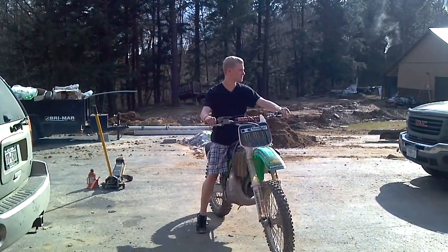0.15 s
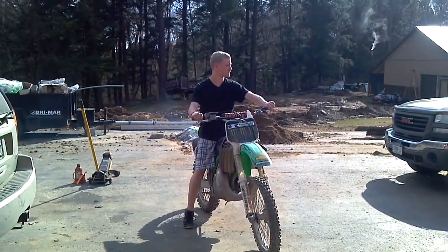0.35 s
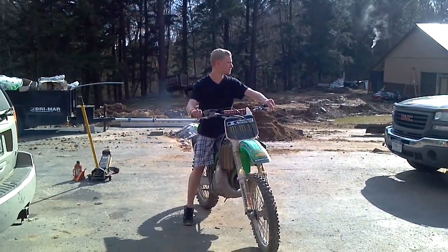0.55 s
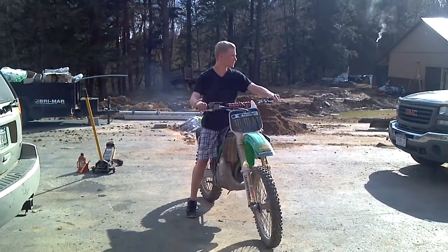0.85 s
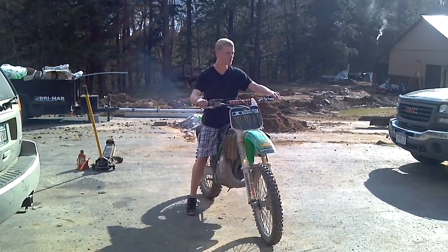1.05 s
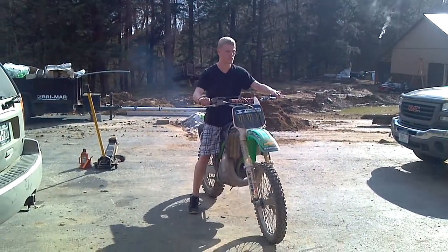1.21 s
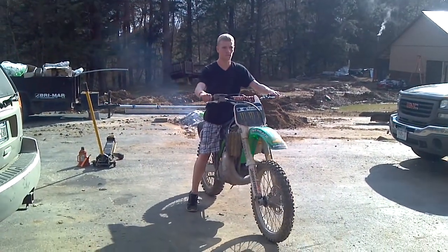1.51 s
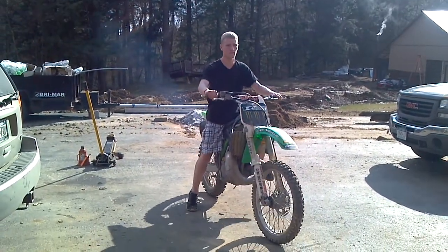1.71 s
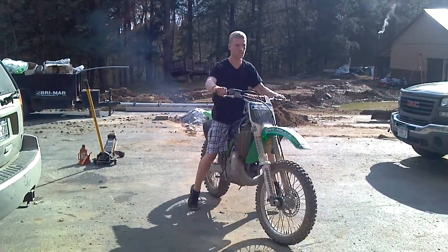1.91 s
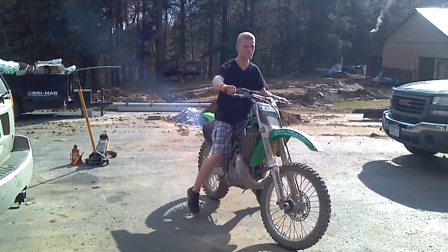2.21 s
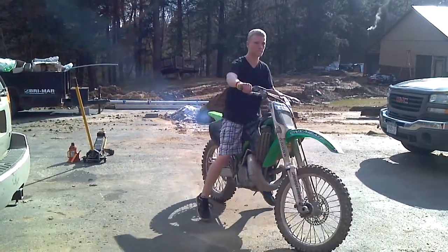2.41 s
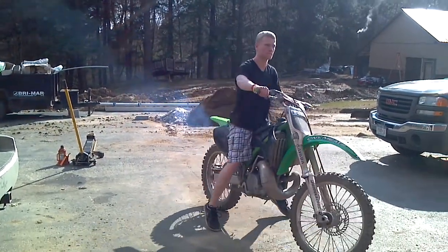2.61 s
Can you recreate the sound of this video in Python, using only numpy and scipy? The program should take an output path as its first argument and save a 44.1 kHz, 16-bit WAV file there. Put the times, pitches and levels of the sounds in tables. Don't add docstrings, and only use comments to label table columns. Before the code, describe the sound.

A single-cylinder two-stroke dirt bike idles with uneven crackling pops, clunks into gear and revs away

```python
import sys
import numpy as np
from scipy import signal
from scipy.fft import rfft, irfft
from scipy.io import wavfile

SR = 44100
rng = np.random.default_rng(int(sys.argv[2]) if len(sys.argv) > 2 else 0)


def amplitude_ratio(level_db):
    exponent = np.asarray(level_db, float) / 20
    return 10 ** exponent


def persist_wave(psi):
    counts = np.round(np.clip(psi, -1, 1) * 32767).astype(np.int16)
    wavfile.write(sys.argv[1], SR, np.atleast_2d(counts).T)


N = 121275

# start_s [s], crack_peak_db [dB], thump_db [dB re usual], roar_db [dB re usual]
IDLE_FIRINGS = [(0.1786, -28, 3, 1), (0.2422, -7, 13, -1.5), (0.386, -17, 4, 1), (0.4472, -11, -7, -3.5),
                (0.5631, -25, 2, 9.5), (0.6834, -43, -5, -12), (0.7761, -27, -10, -23),
                (0.844, -5.5, -12, -1.5), (1.05, -7.5, 14, 1.5), (1.1277, -7.5, 6, 1),
                (1.254, -10.5, 18, 3.5), (1.305, -15.5, -2, 2.5), (1.3535, -8, 3, 1.5),
                (1.475, -2, 14, 0.5), (1.497, -2.5, 18.5, -7.5), (1.5146, -7, 16, 1.5),
                (1.5311, -4, 7, -3.5), (1.5927, -21, 5, 12), (1.7339, -25, 7, 13.5),
                (1.7778, -15.5, 27, 3.5)]
IDLE_TURNS = [6, 2, 5, 2, 4, 4, 3, 2, 7, 3, 5, 2, 2, 5, 1, 1, 1, 4, 8, 2]
# start_s [s], crack_peak_db [dB], thump_db [dB re usual], roar_db [dB re usual]
REV_FIRINGS = [(1.845, -5.5, 7, 2), (1.8622, -12.5, -15, -2), (1.9022, -6, 13, 3.5),
               (1.9365, -21, 12.5, -2), (1.952, -7, -3, 5.5), (2.0203, -13.5, 5, 7.5), (2.0568, -8, 20, 6),
               (2.1085, -7.5, 15, 8.5), (2.1235, -8, 14.5, -2.5), (2.1563, -6.5, 8, 5.5),
               (2.1696, -9, -5, -0.5), (2.2131, -8.5, -21, 10.5), (2.2568, -3.5, 10, 3),
               (2.2988, -8, -16, 9), (2.3428, -6.5, -17, 5.5), (2.391, -4.5, -7, 5), (2.4243, -9.5, -3, 2),
               (2.4436, -8, 1, -3), (2.4945, -3.5, -18, 3), (2.551, -5, -6, 3.5), (2.6294, -6, -17, 3),
               (2.7464, -12, 0, 10)]
REV_TURNS = [3, 1, 2, 2, 1, 4, 2, 3, 1, 2, 1, 3, 3, 3, 3, 3, 2, 1, 3, 3, 4, 5]
# time_s [s], level_db [dB]
LOAD = [(0, -25), (.15, -27.5), (.8, -29), (1.05, -28), (1.45, -27), (1.55, -22), (1.8, -26), (2.05, -25),
        (2.3, -21), (2.55, -23.5), (2.75, -25.5)]
# start_s [s], peak_db [dB]
CLUNKS = [
    (0.0485, -14),
    (0.059, -25),
    (0.086, -22),
    (0.0965, -8),
    (0.1114, -23),
    (0.117, -23),
]
# pitch_hz [Hz], level_db [dB], t60_s [s]
GEARBOX = [(1520, -3, .02), (1750, -5, .015), (2200, -6, .012), (2560, -5, .012), (3150, 1, .02),
           (3550, 3, .025), (3900, -3, .012), (4300, -3, .012), (4800, -3, .012), (5300, -3, .012),
           (6000, -6, .01)]
# pitch_hz [Hz], width_hz [Hz], level_db [dB]
PIPE = [(101.6, 23, -11.5), (157, 30, -9), (228, 22.3, 1.5), (253.7, 35.6, 1.5), (329.5, 32, -1.5),
        (359.6, 37, -5.5), (449.5, 15.6, -12), (653, 28, -13), (881, 40, -13)]
# pitch_hz [Hz], level_db [dB], t60_s [s]
CYLINDER = [(700, -6, .05), (885, -2, .06), (1470, -6, .025), (1800, 1, .028), (1890, 1, .025),
            (2400, -5, .02), (2800, -3, .02), (3350, -4, .02), (4100, -6, .015), (4850, -5, .015),
            (5400, -5, .015)]
# pitch_hz [Hz], level_db [dB], t60_s [s]
SHELL = [(607, -2, .15), (700, -8, .1), (815, -1, .13), (840, -2, .12), (952, -1.5, .1), (1060, -7, .08),
         (1145, -5, .1), (1395, -6, .09), (1790, -9, .06), (2270, -4, .08), (2740, -6, .07),
         (3150, -9, .06), (4140, -7, .07)]
# start_s [s], peak_db [dB]
PINGS = [
    (.2435, -16),
    (1.2535, -20),
    (1.279, -27),
    (1.3045, -21),
]
# pitch_hz [Hz], level_db [dB], t60_s [s]
SHIELD = [(5350, 0, .025), (5600, -5, .02), (6950, -3, .02)]
# pitch_hz [Hz], level_db [dB per Hz]
RATTLE = [(640, -4), (870, -8), (1100, -6.5), (3400, -7.5), (6500, -10), (9000, -19), (16000, -19.5)]
# pitch_hz [Hz], level_db [dB per Hz]
ROAR = [(210, 3), (270, 3), (480, -4.5), (900, -9), (1400, -8), (5500, -9), (8000, -12.5), (16000, -18.5)]
# pitch_hz [Hz], level_db [dB per Hz]
CRACK = [(1000, -18), (4000, -15.5), (7000, -11), (10000, -8), (12000, -1), (14000, -3.5), (16000, -8.5)]
# pitch_hz [Hz], drop_db [dB]
BALANCE_DB = [(60, 3), (150, 2), (380, 2.5), (950, 5.5), (2380, 11.5), (4400, 14.5), (8000, 14),
              (15000, 18)]
# pitch_hz [Hz], lag_rad [radians]
PORT_PHASE = [(0, -3), (260, -3), (1800, -1.5), (4500, 0.43), (16000, 15)]
# pitch_hz [Hz], likeness [0-1]
LIKENESS = [(100, 0.99), (300, 1), (600, 0.86), (1200, 0.68), (2500, 0.15), (6000, 0.39), (12000, 0.35)]

COAST_SAG = 0.46
THROB_LAG, INTAKE_LAG, SLAP_LEAD = .2, .3, .15
THROB_ROUGH = .27
THROB_DB, THROB_GAP_DB, INTAKE_DB = 1, 2, -1
SLAP_DB, SLAP_BOUNCE_S, SLAP_SPREAD_DB = -1, .0035, 1.1
THROB_PER_LOAD_DB, SLAP_PER_LOAD_DB = -0.79, -0.8
RATTLE_DB, RATTLE_PULSE_DB, SING_DB = 2.5, 2.3, -10
PUFF_DB, PUFF_T60_S, PUFF_SPREAD_DB = -8.5, 0.067, 3
CRACK_DB, CRACK_RISE_S, CRACK_T60_S = 2.5, .0005, .014
IDLE_HOLD_S, REV_HOLD_S = .0012, .003
CRACK_TAIL_DB, CRACK_TAIL_T60_S, TAIL_FOLLOWS = -15.5, 0.13, 0.54
ECHO_S, ECHO_DB, ECHO_T60_S, ECHO_HZ = 0.0078, -10, 0.017, 5040
POP_DB, POP_HZ, POP_T60_S = -8, 1530, 0.0013
ROAR_DB, ROAR_RISE_S, ROAR_T60_S = -13.5, 0.0049, 0.28
SHELL_DB, SHELL_SING_DB = -27.5, -20
THUMP_DB, BOOM_DB, BOOM_HZ, BOOM_T60_S = -26.5, -30, 105, .12
WHISTLE_DB, WHISTLE_FROM_HZ, WHISTLE_TO_HZ, WHISTLE_S, WHISTLE_LEAD_S = -14, 900, 8800, .021, .0055
CLUNK_DB, CLUNK_SCRAPE_DB = -6.5, -13


def at_hz(points, hz):
    points = np.array(points)
    return np.interp(np.log(hz + 1), np.log(points[:, 0] + 1), points[:, 1])


def rms_one(x):
    return x / np.sqrt(np.mean(x ** 2) + 1e-20)


def coloured(spectrum):
    hz = np.fft.rfftfreq(N, 1 / SR)
    low_cut = np.minimum(hz / spectrum[0][0], 1) ** 4
    noise = rfft(rng.standard_normal(N))
    return rms_one(irfft(noise * amplitude_ratio(at_hz(spectrum, hz)) * low_cut, N))


def train(s, size):
    out, keep = np.zeros(N), (s >= 0) & (s < N / SR)
    out[(s[keep] * SR).astype(int)] = (size * np.ones(len(s)))[keep]
    return out + 1e-18


def envelope(clicks, rise_s, hold_s, t60):
    t = np.arange(SR // 4) / SR
    release = amplitude_ratio(-60 * np.maximum(t - rise_s - hold_s, 0) / t60)
    shape = np.minimum(t / max(rise_s, 1e-4), 1) * release
    return signal.fftconvolve(clicks, shape)[:N]


def ring(clicks, hz, t60):
    r, w = amplitude_ratio(-60 / (t60 * SR)), 2 * np.pi * hz / SR
    return signal.lfilter([0, np.sin(w)], [1, -2 * r * np.cos(w), r * r], clicks)


def struck(modes, s, size, spread_db):
    luck = rng.standard_normal((len(s), len(modes), 2))
    out = np.zeros(N)
    for k, (hz, db, t60) in enumerate(modes):
        blow = size * amplitude_ratio(db + spread_db * luck[:, k, 0]) * np.sign(luck[:, k, 1])
        out += ring(train(s, blow), hz, t60)
    return out


def sung(modes):
    noise = rng.standard_normal(N)
    return rms_one(sum((-1) ** k * amplitude_ratio(db) * rms_one(ring(noise, hz, t60))
                       for k, (hz, db, t60) in enumerate(modes)))


def heat_shield():
    s, db = np.transpose(PINGS)
    return struck(SHIELD, s, amplitude_ratio(db), spread_db=2)


def gear_lever():
    at, peak_db = np.transpose(CLUNKS)
    s, db = np.transpose([(start + .0007 * k, peak - 3.2 * abs(k - 2))
                          for start, peak in CLUNKS for k in range(-4, 14)])
    s = s + 0.00055 * rng.standard_normal(len(s))
    clunk = struck(GEARBOX, s, amplitude_ratio(db), spread_db=1.5)
    scrape = envelope(train(at - .002, amplitude_ratio(peak_db)), 0.0029, 0.0024, 0.15)
    scrape *= coloured([(1300, -6), (3500, -3), (6000, -8), (9000, -12.5), (16000, -19)])
    return amplitude_ratio(CLUNK_DB) * clunk + amplitude_ratio(CLUNK_SCRAPE_DB) * scrape


def crank():
    s = np.r_[0, [row[0] for row in IDLE_FIRINGS + REV_FIRINGS], N / SR + .02]
    turns = np.cumsum([0] + IDLE_TURNS + REV_TURNS + [1])
    t = np.arange(N) / SR
    k = np.searchsorted(s, t, side="right") - 1
    gap = s[k + 1] - s[k]
    u = (t - s[k]) / gap
    return turns[k] + (turns[k + 1] - turns[k]) * (u + COAST_SAG * gap * u * (1 - u))


def pipe(drive):
    return sum((-1) ** k * amplitude_ratio(db) * ring(drive, hz, np.log(1000) / (np.pi * width))
               for k, (hz, width, db) in enumerate(PIPE))


def pipe_throb(angle, s):
    period = np.gradient(s)
    exhaust = train(s + THROB_LAG * period, amplitude_ratio(1.5 * rng.standard_normal(len(s))))
    intake = train(s + (THROB_LAG + INTAKE_LAG) * period, amplitude_ratio(INTAKE_DB))
    smooth = rms_one(pipe(exhaust - intake))
    rough = rms_one(pipe(rng.standard_normal(N)))
    throb = rms_one((1 - THROB_ROUGH) * smooth + THROB_ROUGH * rough)
    return throb * amplitude_ratio(-THROB_GAP_DB * np.cos(2 * np.pi * angle))


def piston_slap(angle):
    s = np.flatnonzero(np.diff(np.floor(angle + SLAP_LEAD)) > 0) / SR
    s = np.r_[s, s + SLAP_BOUNCE_S]
    size = amplitude_ratio(SLAP_SPREAD_DB * rng.standard_normal(len(s)))
    return rms_one(struck(CYLINDER, s, size, spread_db=SLAP_SPREAD_DB))


def rattle(angle):
    pulse = amplitude_ratio(RATTLE_PULSE_DB * np.cos(2 * np.pi * (angle + 0.077)))
    return pulse * (coloured(RATTLE) + amplitude_ratio(SING_DB) * sung(CYLINDER))


def gas_puff(s):
    clicks = train(s, amplitude_ratio(PUFF_SPREAD_DB * rng.standard_normal(len(s))))
    return rms_one(envelope(clicks, 0.0017, 0.0045, PUFF_T60_S) * coloured(CRACK))


def turning(load_db):
    angle = crank()
    s = np.flatnonzero(np.diff(np.floor(angle), prepend=-1) > 0) / SR
    effort_db = load_db - load_db.min()
    throb = amplitude_ratio(THROB_DB + THROB_PER_LOAD_DB * effort_db) * pipe_throb(angle, s)
    slap = amplitude_ratio(SLAP_DB + SLAP_PER_LOAD_DB * effort_db) * piston_slap(angle)
    return amplitude_ratio(load_db) * (throb + slap + amplitude_ratio(RATTLE_DB) * rattle(angle) + amplitude_ratio(PUFF_DB) * gas_puff(s))


def whistle(s, db):
    t = np.arange(int(WHISTLE_S * SR)) / SR
    pitch_hz = WHISTLE_FROM_HZ + (WHISTLE_TO_HZ - WHISTLE_FROM_HZ) * np.sqrt(t / WHISTLE_S)
    glide = np.sin(2 * np.pi * np.cumsum(pitch_hz) / SR) * np.sin(np.pi * t / WHISTLE_S)
    return amplitude_ratio(WHISTLE_DB) * signal.fftconvolve(train(s - WHISTLE_LEAD_S, amplitude_ratio(db)), glide)[:N]


def thump(s, db, thump_db):
    kick = amplitude_ratio(THUMP_DB) * pipe(train(s + 0.002, amplitude_ratio(db + thump_db)))
    boom = ring(ring(train(s, amplitude_ratio(db)), BOOM_HZ, BOOM_T60_S), BOOM_HZ, BOOM_T60_S / 2)
    return kick + amplitude_ratio(BOOM_DB) * boom * BOOM_HZ / SR * 10


def roar(s, db):
    burn = envelope(train(s, amplitude_ratio(db)), ROAR_RISE_S, 0.00079, ROAR_T60_S)
    rush = burn * (amplitude_ratio(ROAR_DB) * coloured(ROAR) + amplitude_ratio(SHELL_SING_DB) * sung(SHELL))
    return rush + amplitude_ratio(SHELL_DB) * struck(SHELL, s + 0.002755, amplitude_ratio(db), spread_db=3.5)


def crack(s, db, tail_db):
    idling = s < REV_FIRINGS[0][0]
    gate = amplitude_ratio(CRACK_TAIL_DB) * envelope(train(s, amplitude_ratio(tail_db)), 0.005, 0.0018, CRACK_TAIL_T60_S)
    for these, hold_s in [(idling, IDLE_HOLD_S), (~idling, REV_HOLD_S)]:
        gate += envelope(train(s - .0005, amplitude_ratio(db) * these), CRACK_RISE_S, hold_s, CRACK_T60_S)
    echo = envelope(train(s + ECHO_S, amplitude_ratio(tail_db)), 0.003, 0.001, ECHO_T60_S)
    echo *= coloured([(ECHO_HZ / 2, -8), (ECHO_HZ, 0), (ECHO_HZ * 2, -9), (16000, -12)])
    pop = ring(train(s - .0006, amplitude_ratio(db)), POP_HZ, POP_T60_S)
    return amplitude_ratio(CRACK_DB) * gate * coloured(CRACK) + amplitude_ratio(ECHO_DB) * echo + amplitude_ratio(POP_DB) * pop


def firings():
    s, db, thump_db, roar_db = np.transpose(IDLE_FIRINGS + REV_FIRINGS)
    bang = whistle(s, db) + crack(s, db, db + TAIL_FOLLOWS * roar_db)
    return bang + thump(s, db, thump_db) + roar(s, db + roar_db)


def engine():
    s, db = np.transpose(LOAD)
    load_db = np.interp(np.arange(N) / SR, s, db)
    return heat_shield() + gear_lever() + turning(load_db) + firings()


def scene():
    left, other = engine(), engine()
    hz = np.fft.rfftfreq(N, 1 / SR)
    alike = np.clip(at_hz(LIKENESS, hz), 0, 1)
    turn = np.exp(-1j * np.interp(hz, *np.transpose(PORT_PHASE)))
    mixed = alike * turn * rfft(left) + np.sqrt(1 - alike ** 2) * rfft(other)
    right = irfft(amplitude_ratio(-at_hz(BALANCE_DB, hz)) * mixed, N)
    return np.array([left, right])


def band_limit(x):
    return signal.sosfilt(signal.butter(12, 16000, fs=SR, output="sos"), x)


def record(dry):
    ceiling = .86
    first_cut = signal.butter(2, 95, "high", fs=SR, output="sos")
    last_cut = signal.butter(1, 33, "high", fs=SR, output="sos")
    treble_limit = signal.cheby2(14, 30, 16150, fs=SR, output="sos")
    overloaded = np.clip(signal.sosfilt(first_cut, dry), -ceiling, ceiling)
    mix = signal.sosfilt(np.r_[last_cut, treble_limit], overloaded)
    return band_limit(mix)


dry = scene()
out = record(dry)
persist_wave(out)
```